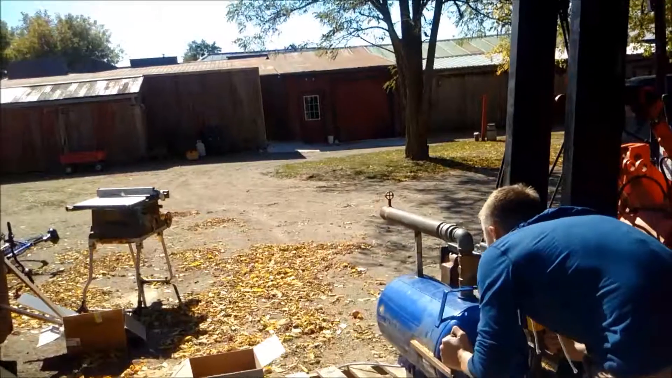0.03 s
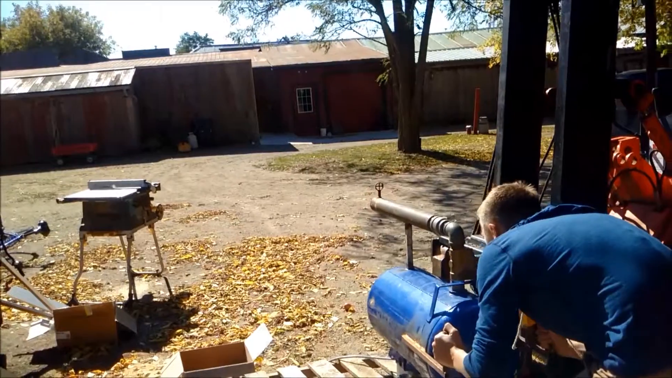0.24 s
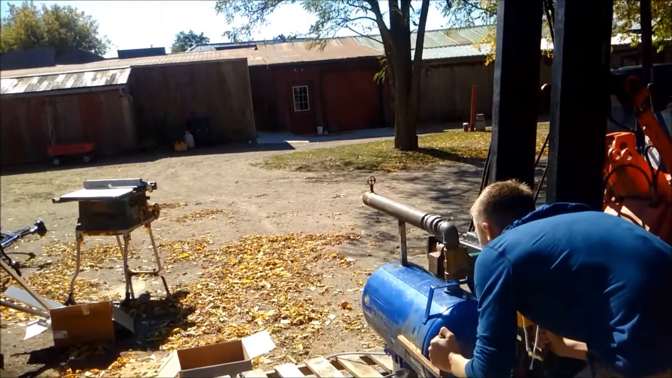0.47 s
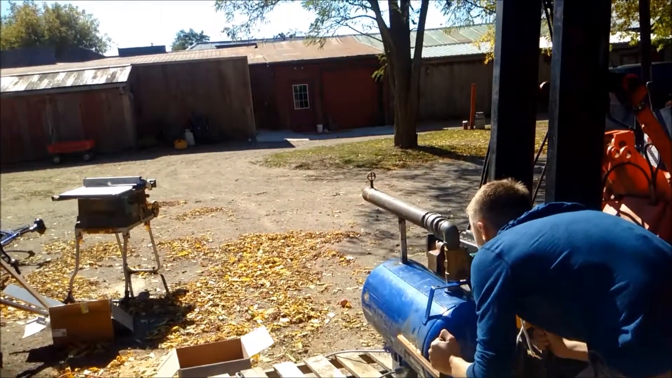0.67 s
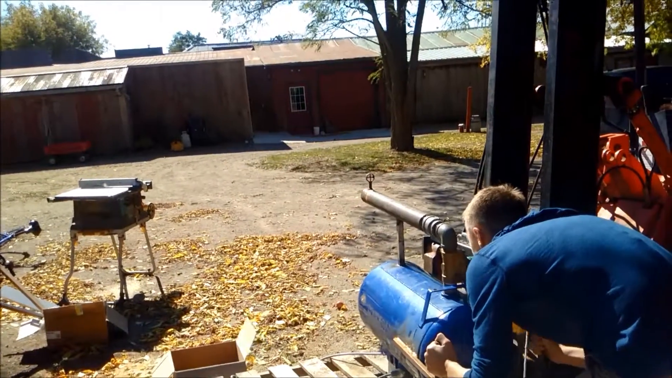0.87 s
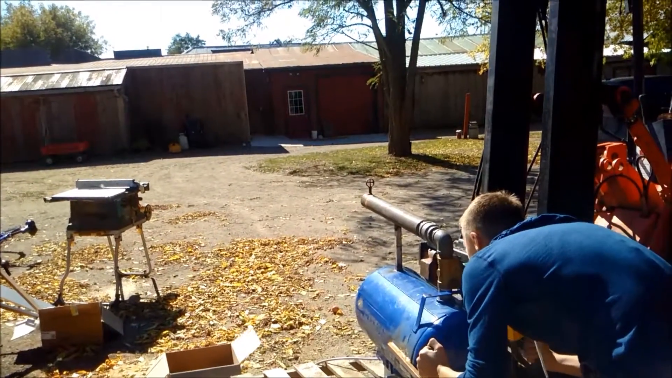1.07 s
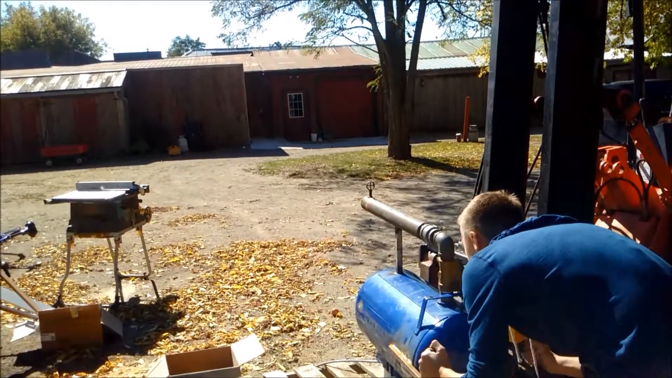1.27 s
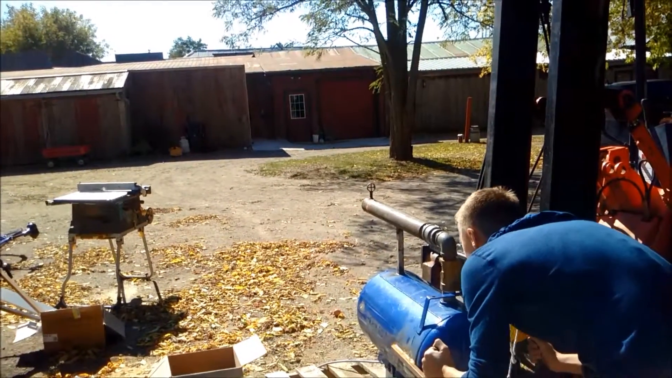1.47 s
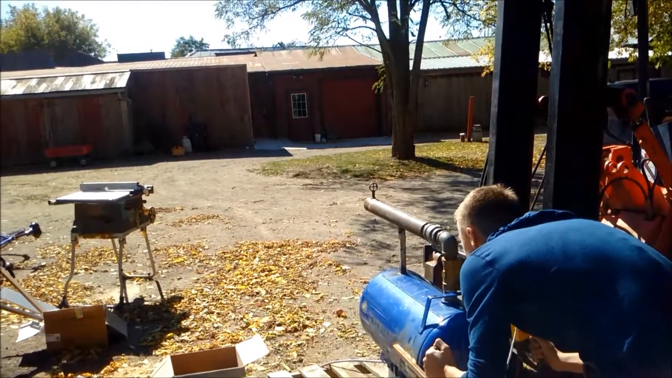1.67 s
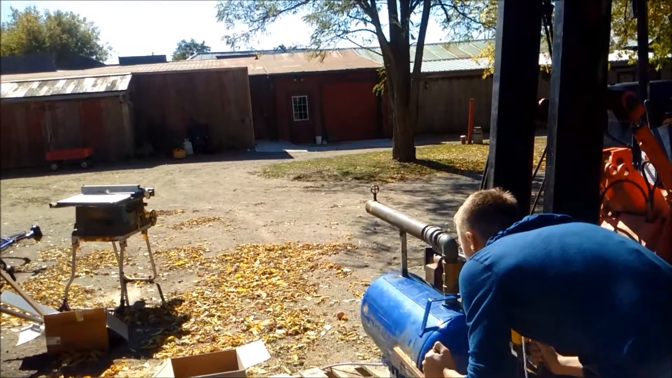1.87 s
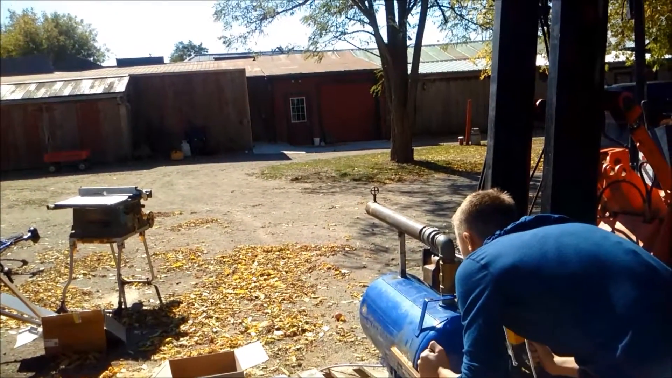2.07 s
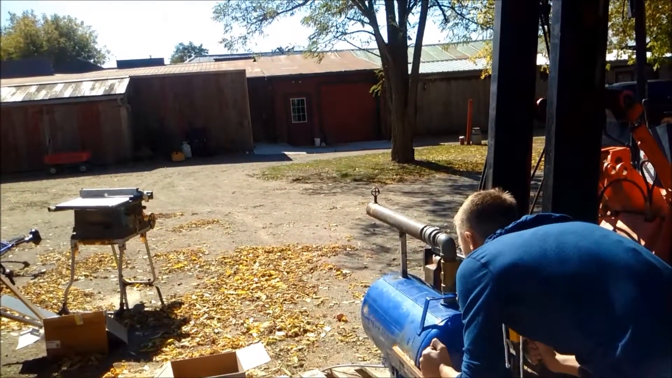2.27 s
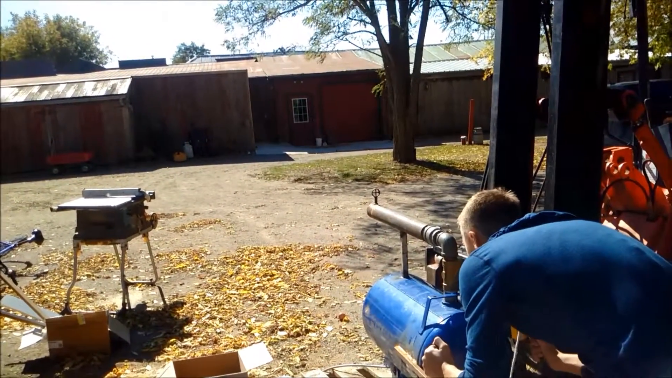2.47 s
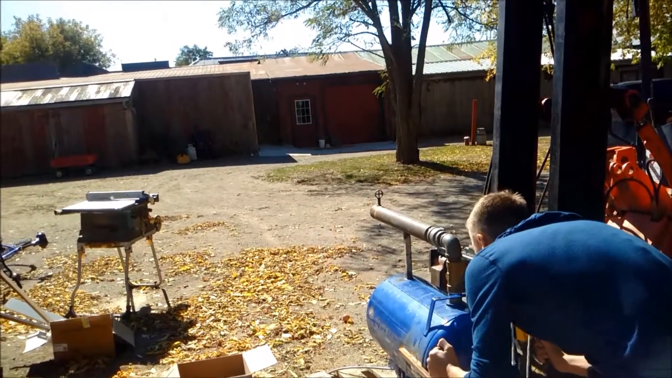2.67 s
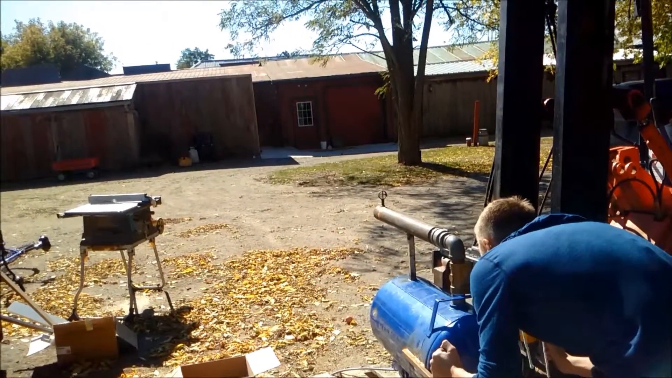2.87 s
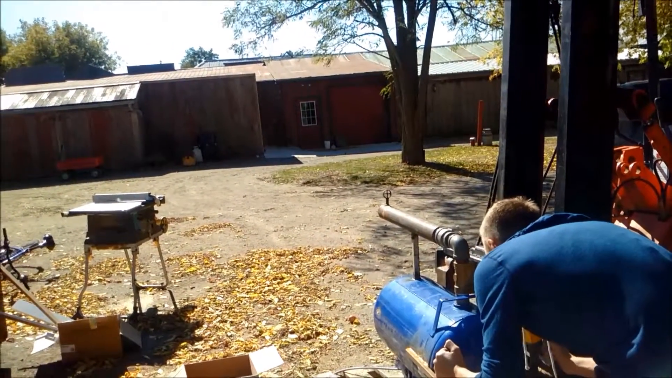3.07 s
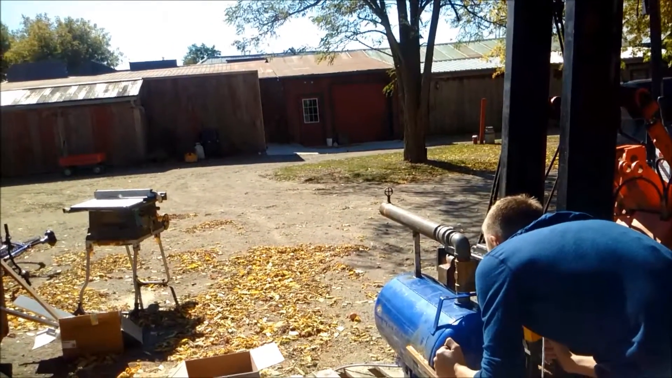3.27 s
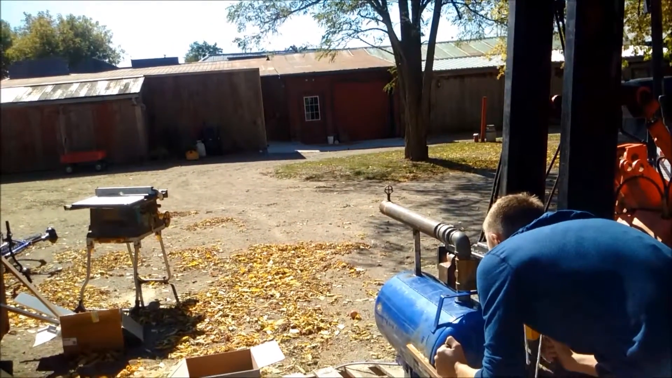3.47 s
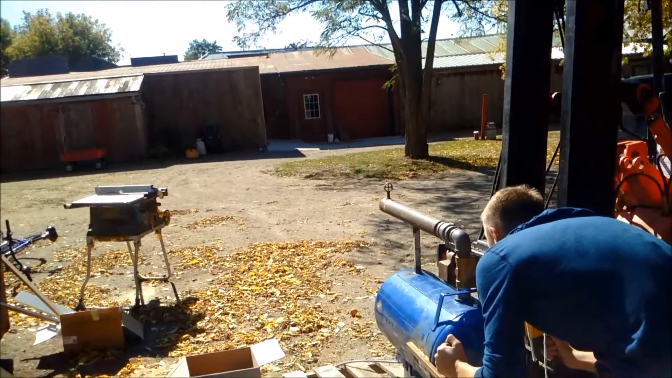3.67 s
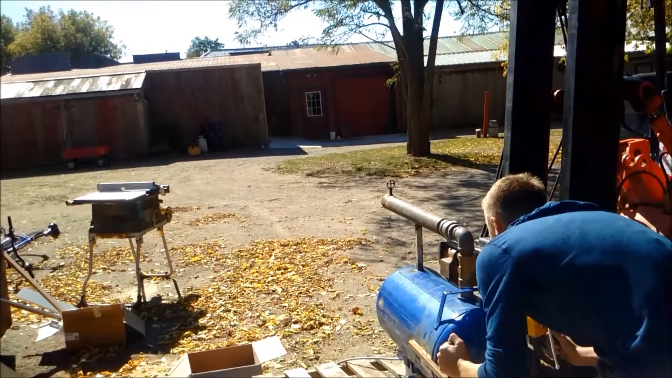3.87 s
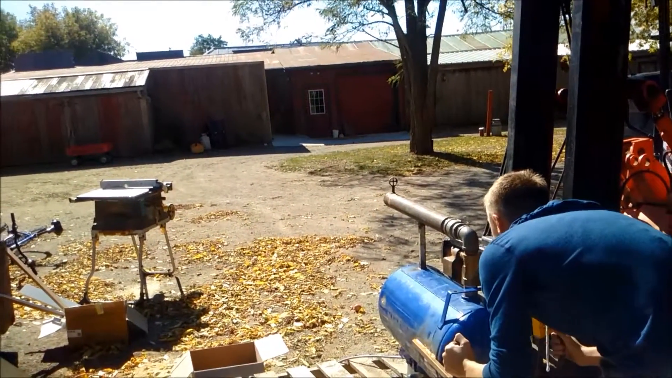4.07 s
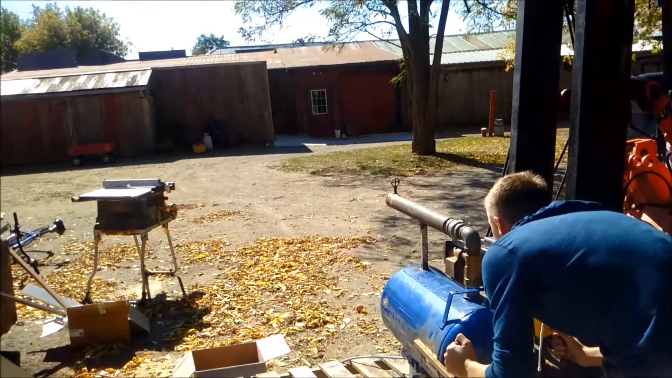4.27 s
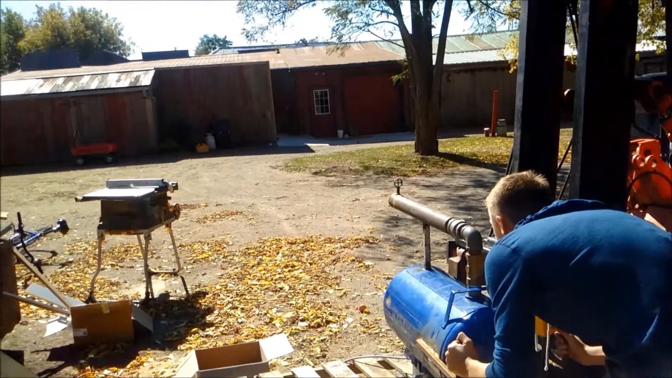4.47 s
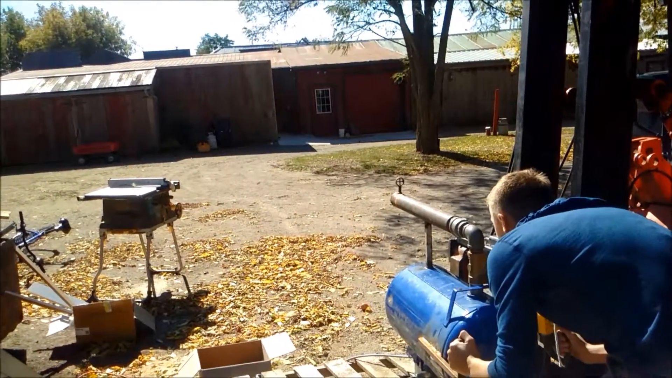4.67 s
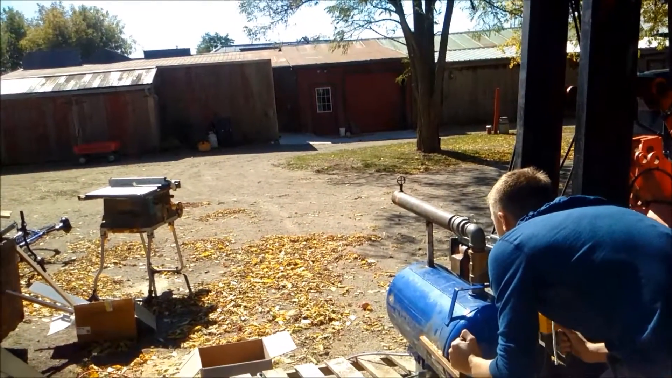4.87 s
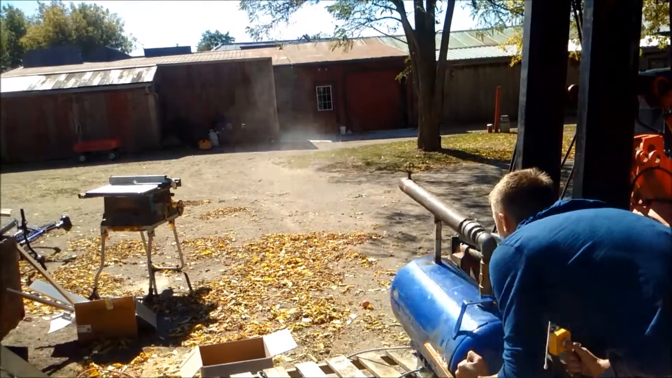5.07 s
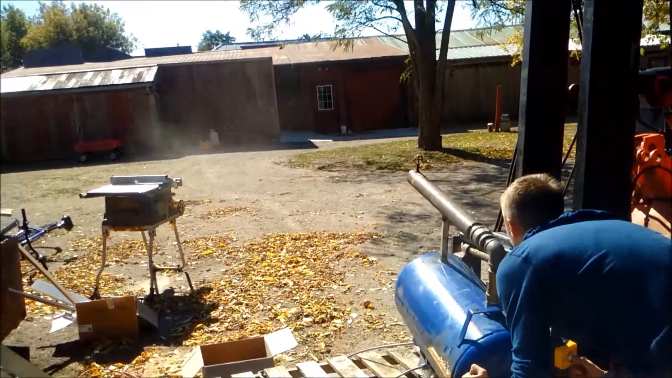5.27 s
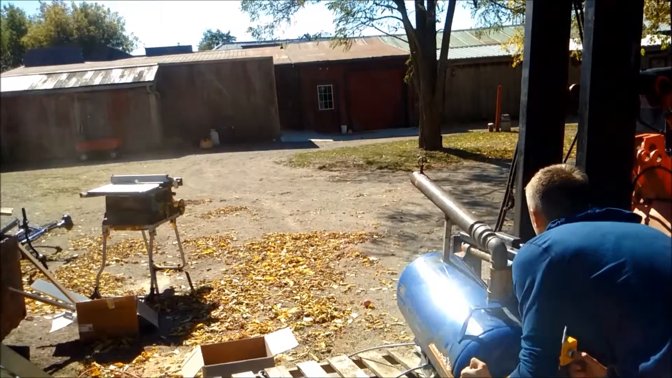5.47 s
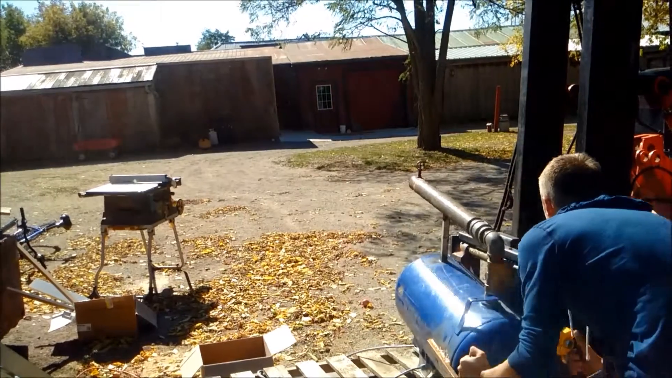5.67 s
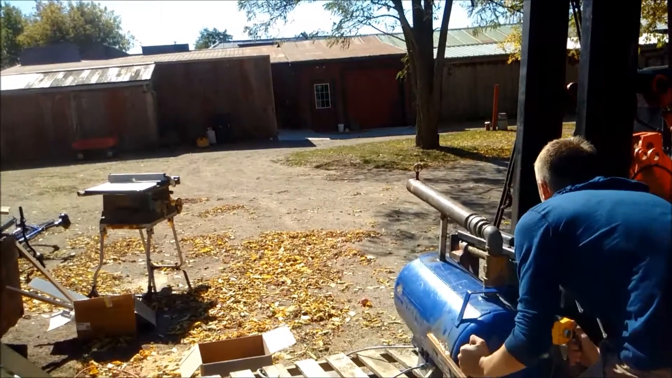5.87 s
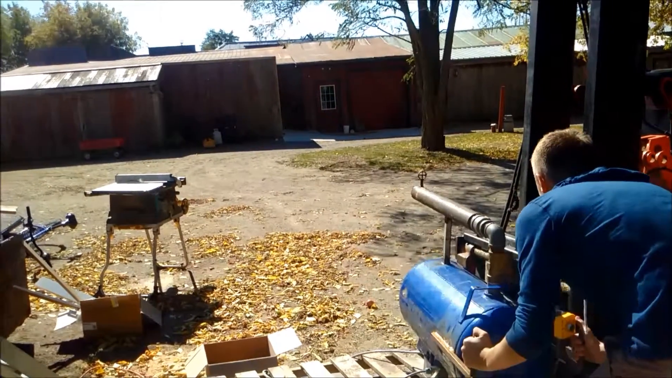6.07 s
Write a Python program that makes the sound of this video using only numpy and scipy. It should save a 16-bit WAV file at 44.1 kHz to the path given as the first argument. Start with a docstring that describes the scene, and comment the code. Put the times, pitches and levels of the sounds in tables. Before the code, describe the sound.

An electric air compressor drones steadily in a farmyard, then an air cannon fires a harsh honking blast, answered by a bang on a distant shed wall.

```python
"""A farmyard: an electric air compressor drones, its pump puffing twice a turn and its motor whining.
An air cannon's valve hisses open, the tank empties in a blast of shaped noise and a honk of falling pitch;
the barrel hums on as damped modes and the sheds send back a scattered, dulled echo.
About half a second later the shot bangs on a shed wall: low booms, cracks of noise and ringing panels.
A gain control ducks under the loud peaks."""
import sys
import numpy as np
from scipy import signal
from scipy.fft import rfft, irfft, next_fast_len
from scipy.io import wavfile
from scipy.ndimage import uniform_filter1d, minimum_filter1d, map_coordinates

SR = 44100
rng = np.random.default_rng(int(sys.argv[2]) if len(sys.argv) > 2 else 0)


def generate_wav(signal):
    """Clip the signal to [-1, 1] and save it as 16-bit WAV at the path in sys.argv[1]."""
    frames = np.transpose(np.atleast_2d(signal))
    scaled = np.clip(frames, -1, 1) * 32767
    pcm = np.round(scaled).astype(np.int16)
    wavfile.write(sys.argv[1], SR, pcm)


N = 270774
TIME = np.arange(N) / SR

# pump speed, hunting slowly with the load: time_s, speed_hz [turns per second]
SPEED = [(0.0, 47.207), (0.85, 47.555), (1.95, 47.275), (2.5, 47.562), (2.8, 47.434), (4.25, 47.369),
         (4.7, 47.639), (5.3, 47.388), (5.55, 47.776), (5.9, 47.378), (6.14, 47.462)]


def amp(db):
    """Decibels to gain."""
    return 10 ** (np.asarray(db) / 20)


def unit(x):
    """Scale to rms 1."""
    return x / np.sqrt(np.mean(x ** 2) + 1e-20)


def along(points, hz):
    """(Hz, value) points read on a log frequency axis."""
    point_hz, value = np.transpose(points)
    return np.interp(np.log(hz + 1), np.log(point_hz + 1), value)


def wobble(knots_hz):
    """A smooth random curve through knots_hz normal draws a second."""
    knots = rng.standard_normal(int(N * knots_hz / SR) + 4)
    return map_coordinates(knots, [TIME * knots_hz])


def filtered(x, response):
    """x times a complex response of frequency."""
    size = next_fast_len(N + SR // 2)
    spectrum = rfft(x, size) * response(np.fft.rfftfreq(size, 1 / SR))
    return irfft(spectrum, size)[..., :N]


def colour(points):
    """The response of a (Hz, dB) spectrum."""
    return lambda hz: amp(along(points, hz))


def resonances(modes):
    """The causal response of (Hz, width Hz, dB) resonances, added with alternating signs."""
    def response(hz):
        total = 0
        for k, (centre_hz, width_hz, db) in enumerate(modes):
            bandpass = 1j * hz * width_hz / (centre_hz ** 2 - hz ** 2 + 1j * hz * width_hz)
            total = total + (-1) ** k * amp(db) * bandpass
        return total
    return response


def rush(response, likeness=None):
    """Stereo noise of rms 1; mid and side shares set the left-right likeness at each frequency."""
    # default left-right likeness, nearly mono below 1.7 kHz, varying above:
    # pitch_hz, likeness [correlation, -1 to 1]
    default_likeness = [(70, 0.92), (300, 0.98), (700, 1), (1650, 1), (2050, 0.82), (2400, 0.35),
                        (3300, 0.83), (4400, 0.26), (5200, -0.33), (6900, 0.46), (9000, -0.45),
                        (15000, -0.94)]
    points = default_likeness if likeness is None else likeness

    def mid_side_response(hz):
        turn_rad = np.arccos(np.clip(along(points, hz), -1, 1)) / 2
        return response(hz) * np.array([np.cos(turn_rad), np.sin(turn_rad)])

    mid, side = filtered(rng.standard_normal((2, N)), mid_side_response)
    return unit(np.array([mid + side, mid - side]))


def fade(start_s, t60_s, attack_s):
    """Envelope of something struck at start_s: exponential attack and decay."""
    age_s = np.maximum(TIME - start_s, 0)
    return amp(-60 * age_s / t60_s) * (1 - np.exp(-age_s / attack_s))


def ring(modes, start_s, attack_s):
    """Damped (Hz, dB, t60 s) modes set going at start_s."""
    return sum(amp(db) * fade(start_s, t60_s, attack_s) * np.sin(2 * np.pi * hz * (TIME - start_s))
               for hz, db, t60_s in modes)


def cannon():
    """The valve hisses, then the tank's air roars out: returns the broad roar and the muzzle's honk."""
    # left-right likeness of the blast: pitch_hz, likeness [correlation, -1 to 1]
    blast_likeness = [(900, .97), (2400, 0.84), (6000, 0.69), (10000, 0.64), (15000, -0.45)]
    # valve hiss spectrum: pitch_hz, relative_db [per Hz]
    hiss_spectrum = [(1500, -16), (3500, -17), (4300, -3.5), (5500, -8), (7500, -12.5), (10000, -25),
                     (16000, -31)]
    # broad jet spectrum: pitch_hz, relative_db [per Hz]
    jet_spectrum = [(59, -67), (100, -17), (238, -12), (307, -3.5), (460, -47), (618, 1), (832, -11),
                    (925, -2), (1330, -13), (2250, -1), (3090, -10.5), (4070, -8), (15800, -23.5)]
    # resonances of the jet in the muzzle: pitch_hz, width_hz, relative_db
    muzzle_modes = [(900, 100, -1), (2130, 300, 0), (4020, 110, -12)]
    dump_s, empty_s = 5.074, 5.193
    attack_s, sag_db_per_s, release_t60_s = 0.02, 27, 0.055
    jet_db, hiss_db, honk_db, muzzle_db = 2.5, -4, 0.5, -2  # at full flow
    honk_start_hz, honk_sag_hz_per_s = 2400, 1750

    # flow builds up, sinks with the tank pressure, then stops
    age_s = np.clip(TIME - dump_s, 0, empty_s - dump_s)
    release_db = -60 * np.maximum(TIME - empty_s, 0) / release_t60_s
    flow_db = release_db - sag_db_per_s * age_s + 0.84 * wobble(120)
    flow = (1 - np.exp(-age_s / attack_s)) * amp(flow_db)

    valve = amp(-11) * fade(5.046, t60_s=0.17, attack_s=0.0017)
    hiss = (valve + amp(hiss_db) * flow) * rush(colour(hiss_spectrum), blast_likeness)
    jet = amp(jet_db) * flow * rush(colour(jet_spectrum), blast_likeness)

    # pitch sags as the escaping air cools; turbulence shakes pitch and strength
    pitch_hz = honk_start_hz - honk_sag_hz_per_s * age_s + 75 * wobble(250)
    honk = amp(honk_db + 1.9 * wobble(150)) * np.sin(2 * np.pi * np.cumsum(pitch_hz) / SR)
    muzzle = amp(muzzle_db) * rush(resonances(muzzle_modes), blast_likeness)
    return hiss + jet, flow * (honk + muzzle)


def muzzle_pop():
    """The shot pops out of the muzzle: two short damped modes."""
    # pitch_hz, level_db, t60_s
    pop_modes = [(285, 9, .06), (665, 5, .05)]
    return ring(pop_modes, start_s=5.097, attack_s=0.002)


def barrel_hum():
    """The air column of the emptied barrel rings on."""
    # pitch_hz, level_db, t60_s
    barrel_modes = [(100.3, -7.5, 0.96), (268, -2, 0.43)]
    return ring(barrel_modes, start_s=5.2, attack_s=0.11)


def blows(crack_t60_s):
    """The shot strikes and rattles the shed: each blow is a short damped boom with a crack of noise."""
    # start_s, boom_db, boom_hz, boom_t60_s, crack_db [relative to boom_db]
    blow_rows = [(5.527, 10, 226, 0.069, -7.5), (5.59, -3.5, 240, 0.29, -26), (5.648, -9.5, 205, 0.1, -17)]
    # crack spectrum: pitch_hz, relative_db [per Hz]
    crack_spectrum = [(100, -26), (300, -7), (800, -2.5), (1300, -12), (2100, -1), (3200, -9.5),
                      (5500, -17), (9000, -27), (16000, -43)]
    booms = sum(ring([(hz, db, t60_s)], start_s, attack_s=0.00099)
                for start_s, db, hz, t60_s, _ in blow_rows)
    cracks = sum(amp(db + crack_db) * fade(start_s, crack_t60_s, attack_s=0.00052)
                 for start_s, db, _, _, crack_db in blow_rows)
    return booms + cracks * rush(colour(crack_spectrum))


def wall_panels():
    """The shed's wall panels ring after the blow: noise through two low resonances."""
    # pitch_hz, width_hz, relative_db
    panel_modes = [(196, 48, 10), (225, 19, -10)]
    return amp(-8.5) * fade(5.53, t60_s=0.64, attack_s=0.019) * rush(resonances(panel_modes))


def yard(x, delay_s, dull_hz):
    """A scattered answer from walls: decaying noise tail, delayed and dulled by the distance."""
    # reverberation: pitch_hz, t60_s
    yard_t60 = [(150, 0.55), (2000, 0.46), (6000, 0.41), (14000, 0.48)]
    hz, tail_s, bins = signal.stft(rng.standard_normal((2, SR // 2)), SR, nperseg=256)
    decay = amp(-60 * tail_s / along(yard_t60, hz)[:, None])
    tail = signal.istft(bins * decay, SR, nperseg=256)[1]
    tail = tail + 0.81 * tail[::-1]  # share between left and right
    wet = signal.fftconvolve(x, tail / np.linalg.norm(tail[0]), axes=1)[:, :N]
    return filtered(wet, lambda f: np.exp(-2j * np.pi * f * delay_s) / (1 + 1j * f / dull_hz))


def pump(turns, level_db, second_at_turn, second_db, jitter_turns, scatter_db, own_db, alternate,
         half_order_db, puff_db):
    """A strong and a weak puff each turn ring the housing; no two turns are quite alike."""
    # tone: order [multiple of the speed], relative_db
    pump_orders = [(1, -15), (2, -8.5), (3, -12), (4, -0.5), (5, 0.5), (6, -12), (7, -6), (8, -19),
                   (9, -16.5), (10, -9), (11, -50), (12, -10), (13, -2), (14, 2), (15, 0.5), (16, -3),
                   (17, -4), (18, 0), (19, -8), (20, -10), (21, -36), (22, -22.5), (23, -26), (24, -19),
                   (25, -23), (26, -38), (27, -36), (28, -17), (29, -28), (30, -23.5), (31, -18.5)]
    # intake and housing: pitch_hz, width_hz, relative_db
    housing_modes = [(198, 80.2, -0.5), (659, 171.5, 0.5), (878, 115.9, -2)]
    housing = resonances(housing_modes)
    nominal_hz = SPEED[1][1]
    angle = turns + jitter_turns * wobble(70)
    tone = np.zeros(N)
    for order, db in pump_orders:
        two_puffs = 1 + amp(second_db) * np.exp(-2j * np.pi * order * second_at_turn)
        # two chambers in a row: the ringing builds up after the push
        lag_rad = np.angle(two_puffs * housing(order * nominal_hz) ** 2)
        tone += amp(db + own_db * wobble(14)) * np.cos(2 * np.pi * order * angle + lag_rad)
    tone = amp(level_db + scatter_db * wobble(60)) * unit(tone)
    # alternate turns differ: lines halfway between the orders, order 4.5 added separately
    tone *= 1 - alternate * np.cos(np.pi * angle)
    tone -= amp(half_order_db) * np.cos(np.pi * 9 * angle)
    # turbulent air comes with each strong puff
    gate = unit(np.exp(1.6 * np.cos(2 * np.pi * (angle - 0.1))))
    return tone + amp(puff_db) * gate * rush(housing)


def motor(turns, slowing_hz, waver_db, drift_turns, port_lag_rad, swing_rad, sides_db):
    """Rotor slots sing, louder under load; pulsing magnetic pull swings pitch and strength: sidebands."""
    # weaker slot tones: order [multiple of the speed], sideband [multiple of pull_hz],
    # relative_db [sides_db is added]
    weak_tones = [(45, 0, -41), (49, -1, -39), (49, 0, -41), (54, -1, -31.5), (55, -1, -41), (55, 0, -40),
                  (54, 1, -34.5)]
    pull_hz = 120
    slot_db, slot_db_per_hz = -29.5, 24  # level at the rated speed, gain per Hz of slowing
    whine = np.zeros((2, N))
    slip_turns = drift_turns * wobble(12)
    main = (54, 0, slot_db + slot_db_per_hz * slowing_hz)
    weaker = [(order, sideband, db + sides_db) for order, sideband, db in weak_tones]
    for order, sideband, db in [main, *weaker]:
        cycles = order * (turns + slip_turns) + sideband * pull_hz * TIME
        # swing_rad 0: sidebands flutter the strength; pi / 2: the pitch
        phase = 2 * np.pi * cycles + swing_rad * abs(sideband)
        port_phase = phase + port_lag_rad * np.array([[1], [-1]])
        whine += amp(db + waver_db * wobble(10)) * np.sqrt(2) * np.sin(port_phase)
    return whine


def compressor():
    """Pump, motor and fan share one slightly wandering speed; the shroud rings with noise."""
    # rush of the cooling fan and valves: pitch_hz, relative_db [per Hz]
    fan_spectrum = [(30, -22), (60, -6.5), (220, -7), (430, 0), (510, -6), (820, 3.5), (1220, -11),
                    (1620, -9), (1950, 1), (2750, -1.5), (3050, -6.5), (4600, -12.5), (8000, -16),
                    (15500, -25)]
    # motor shroud: pitch_hz, width_hz, relative_db [before squaring]
    shroud_modes = [(3780, 300, 1), (5130, 320, 1), (6860, 510, -1.5)]
    rated_hz, start_turns = 47.44, 0.57
    speed_hz = np.interp(TIME, *np.transpose(SPEED))
    turns = start_turns + np.cumsum(speed_hz) / SR + 0.003 * wobble(5)
    strokes = pump(turns, level_db=-19.5, second_at_turn=0.57, second_db=-5.5, jitter_turns=0.0011,
                   scatter_db=0.1, own_db=0.3, alternate=0.094, half_order_db=-36.0, puff_db=-42.5)
    whine = motor(turns, rated_hz - speed_hz, waver_db=1.5, drift_turns=0.0012, port_lag_rad=0.44,
                  swing_rad=1.16, sides_db=1.5)
    fan_db = -23.5 + 0.73 * wobble(30) + 0.34 * np.cos(2 * np.pi * turns)
    fan = amp(fan_db) * rush(colour(fan_spectrum))
    # squared: sharp ringing, deep valleys between the resonances
    shroud_noise = rush(lambda hz: np.abs(resonances(shroud_modes)(hz)) ** 2)
    shroud = amp(-35.5 + 1.3 * wobble(24.93)) * shroud_noise
    whine_balance = amp(1.2 * np.array([[1], [-1]]))
    return strokes + shroud + fan + whine * whine_balance


def scene():
    """The shot and its echoes over the running compressor."""
    roar, honk = cannon()
    bangs = blows(crack_t60_s=0.18)
    near = amp(-11) * yard(roar + bangs, delay_s=0.02, dull_hz=5060)
    # the roar is beamed at the sheds and comes back from them
    sheds = amp(-21) * yard(roar, delay_s=0.16, dull_hz=4000)
    shot = roar + honk + muzzle_pop() + barrel_hum()
    return shot + bangs + wall_panels() + near + sheds + compressor()


def gain_control(x, ceiling_db, hold_s, recovery_db_per_s):
    """Peaks pull the gain down at once; it holds, then climbs back at a steady rate in dB."""
    peak_db = 20 * np.log10(np.abs(x).max(axis=0) + 1e-9)
    needed_db = np.minimum(0, ceiling_db - peak_db)
    size = 2 * int(hold_s * SR / 2) + 1
    held_db = minimum_filter1d(needed_db, size, origin=size // 2)
    climb_db = recovery_db_per_s * TIME
    gain_db = np.minimum.accumulate(held_db - climb_db) + climb_db
    smooth_db = uniform_filter1d(minimum_filter1d(gain_db, size=64), size=64)
    return x * amp(smooth_db)


def record(dry):
    """Microphone colour, gain control, an opening fade and the band limit."""
    # the microphone's top resonance: pitch_hz, gain_db
    port = [(12000, 1), (14000, 0.5), (15200, 16), (16000, 8.5)]
    top_hz = 15800
    fade_db = np.interp(TIME, [0, 0.76], [-28, 0])
    coloured = filtered(dry, colour(port))
    levelled = gain_control(coloured, ceiling_db=0.17, hold_s=0.028, recovery_db_per_s=158)
    return filtered(levelled * amp(fade_db), lambda hz: hz < top_hz)


dry = scene()
out = record(dry)
generate_wav(out)
```